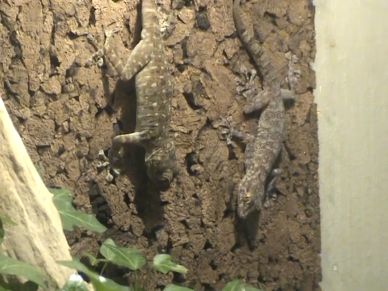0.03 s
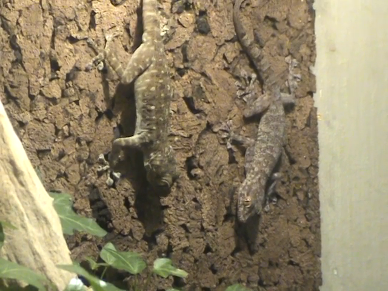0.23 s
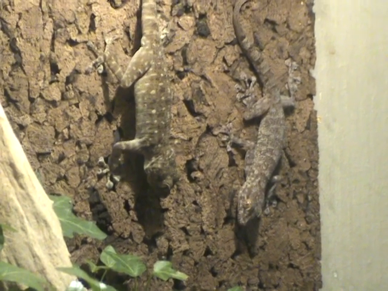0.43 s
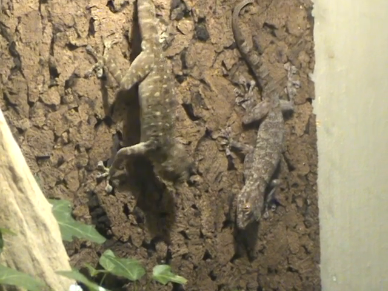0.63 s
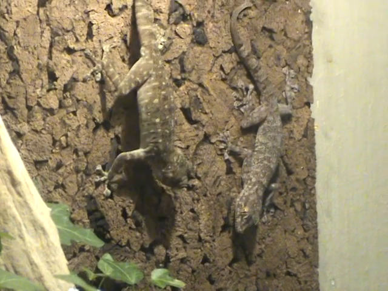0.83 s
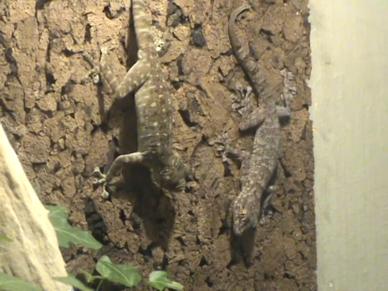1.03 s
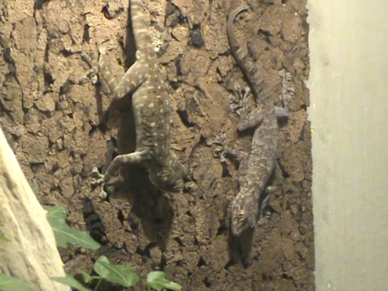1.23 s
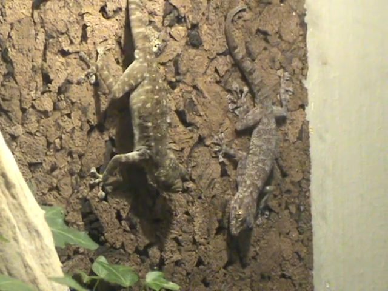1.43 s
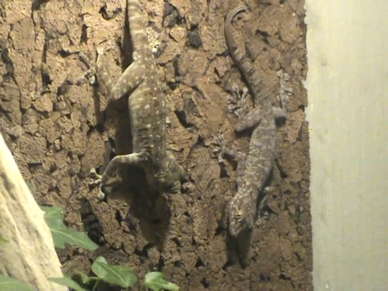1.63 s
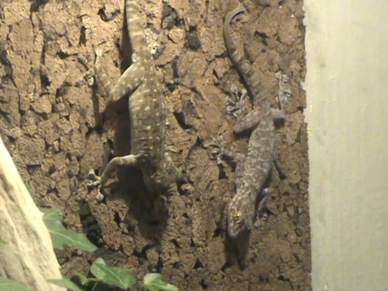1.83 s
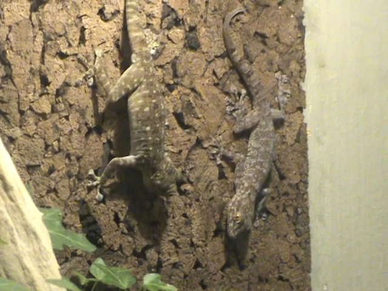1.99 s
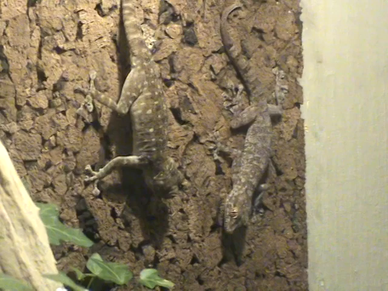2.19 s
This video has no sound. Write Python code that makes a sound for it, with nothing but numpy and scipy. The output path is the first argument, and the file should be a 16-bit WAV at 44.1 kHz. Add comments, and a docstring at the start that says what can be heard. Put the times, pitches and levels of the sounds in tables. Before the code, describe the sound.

In a quiet room, a gecko makes one short, clicking chirp, scuffs faintly on bark, then chirps again. The calls echo briefly off the glass enclosure walls, and a few tiny scuffs follow over a faint, steady hum and hiss.

```python
"""A gecko chirps twice in a glass-walled enclosure in a quiet room.
Each click-like chirp is a few fast throat pulses ringing near 4 kHz, with a falling squeak;
the walls throw it back, the glass rings and the room reverberates.
Behind it: air noise, appliance hum, a faint sinking tone and a few soft scuffs on bark."""
import sys
import numpy as np
from scipy import signal
from scipy.fft import rfft, irfft
from scipy.io import wavfile
from scipy.ndimage import uniform_filter1d

SR = 44100
rng = np.random.default_rng(int(sys.argv[2]) if len(sys.argv) > 2 else 0)


def put_to_file(sound):
    """Save the sound as 16-bit audio at rate SR, in the file named by the first command-line argument."""
    columns = np.atleast_2d(sound).T  # one column per channel
    safe = np.clip(columns, -1, 1)
    whole_steps = np.round(safe * 32767)
    wavfile.write(sys.argv[1], SR, whole_steps.astype(np.int16))


N = 103635


def amp(db):
    return 10 ** (np.asarray(db) / 20)


def unit_rms(x):
    return x / np.sqrt(np.mean(abs(x) ** 2) + 1e-20)


def log_interp(points, hz):
    """Interpolate (Hz, value) rows on a log-frequency axis."""
    point_hz, value = np.transpose(points)
    return np.interp(np.log(hz + 1), np.log(point_hz + 1), value)


def add(mix, start_s, sound):
    part = mix[round(start_s * SR):][:len(sound)]
    part += sound[:len(part)]


def minimum_phase(gain):
    """Spectrum of the quickest causal response with these magnitudes."""
    log_gain = np.log(np.r_[gain, gain[-2:0:-1]])
    return np.exp(np.conj(signal.hilbert(log_gain)))[:len(gain)]


def drift(bandwidth_hz):
    """Low-passed noise, rms 1."""
    hz = np.fft.rfftfreq(N, 1 / SR)
    return unit_rms(irfft(rfft(rng.standard_normal(N)) * np.exp(-(hz / bandwidth_hz) ** 2), N))


def spread(mid, side, side_db):
    """Mid/side to left/right, scaled to unit mid energy."""
    return np.array([mid + amp(side_db) * side, mid - amp(side_db) * side]) / np.linalg.norm(mid)


def tone(hz, level_db, flutter_db=1.2):
    """Sine with a slightly fluttering level."""
    peak = np.sqrt(2) * amp(level_db + flutter_db * drift(25))
    return peak * np.sin(2 * np.pi * (np.cumsum(hz) / SR + rng.random()))


def air(level_db=-55, patch_db=0.7, size=2048):
    """Steady room noise and hiss with faint drifting patches; the bass is nearly mono."""
    # Each row: frequency in Hz, relative spectral density in dB.
    density = [(25, -24), (38, -23), (52, -15), (75, -15), (105, -6), (140, -1), (200, -8.5), (260, -6.5),
               (310, -9), (400, -7.5), (520, -15), (800, -13), (1400, -18.5), (2500, -23), (3600, -25),
               (4500, -28.3), (9000, -31), (15500, -31.7)]
    # Each row: frequency in Hz, left-right coherence from 0 to 1.
    coherence = [(60, 0.99), (150, 0.99), (350, 0.87), (700, 0.083), (1400, 0.23), (3000, 0.13),
                 (6000, 0.34), (10000, 0.56), (15000, 0.93)]
    hop, hz = size // 4, np.fft.rfftfreq(size, 1 / SR)
    left_re, left_im, other_re, other_im, patches = rng.standard_normal((N // hop + 5, len(hz), 5)).T
    patches = uniform_filter1d(patches, size=16, axis=0)  # across frequency
    patches = unit_rms(uniform_filter1d(patches, size=8, axis=1))  # across time
    shared = log_interp(coherence, hz)[:, None]
    left = left_re + 1j * left_im
    right = shared * left + np.sqrt(1 - shared ** 2) * (other_re + 1j * other_im)
    spectra = np.array([left, right]) * amp(log_interp(density, hz)[:, None] + patch_db * patches)
    noise = signal.istft(spectra, nperseg=size, noverlap=size - hop)[1][:, :N]
    return amp(level_db) * unit_rms(noise)


def appliance_hum():
    """Wavering hum of fans and lamps."""
    # Each row: frequency in Hz, level in dB, rms waver in Hz.
    lines = [(119.8, -67, 1.1), (148.2, -64, 1.1), (242.7, -67.5, 0.41), (444.3, -72, 1.87),
             (1049, -71.5, 8.7), (1295, -78.5, 1.5), (2480, -84, 0.52), (5030, -90, 1.3), (9367, -84, 30)]
    return sum(tone(hz + waver_hz * drift(39.7), db) for hz, db, waver_hz in lines)


def sinking_tone():
    """A faint tone that sinks and fades."""
    # Each row: time in seconds, frequency in Hz, level in dB.
    path = [(0, 335, -62.5), (0.4, 343.6, -64.5), (0.548, 344, -70), (0.801, 326.9, -63.5),
            (1.099, 305, -75), (1.5, 298, -102), (2.35, 290, -96)]
    time_s, hz, db = np.transpose(path)
    t = np.arange(N) / SR
    return tone(np.interp(t, time_s, hz), np.interp(t, time_s, db))


def scuff(length_s, level_db, treble_db, size=4096):
    """A brief grainy rub on dry bark."""
    # Each row: frequency in Hz, relative gain in dB.
    bark = [(200, -16), (550, -11), (820, 5), (1200, -8), (2500, -8), (3500, -9), (4100, -15), (4900, -8),
            (6000, -20), (14000, -28)]
    progress, hz = np.arange(size) / SR / length_s, np.fft.rfftfreq(size, 1 / SR)
    envelope = progress * np.exp(-3 * progress)
    grains = rng.standard_normal(size) * rng.exponential(1, size) * envelope
    shelf_db = treble_db * log_interp([(1200, 0.048), (3000, 1)], hz)
    rub = irfft(rfft(grains) * minimum_phase(amp(log_interp(bark, hz) + shelf_db)))
    return amp(level_db) * unit_rms(rub) * np.sqrt(length_s * SR / size)


def squeak(t, start_hz=3268, fall_hz_per_s=134500, delay_s=0.00266, length_s=0.015):
    """A note that slides down as the throat closes."""
    age_s = np.clip(t - delay_s, 0, length_s)
    hz = start_hz - fall_hz_per_s * age_s
    return np.sin(np.pi * age_s / length_s) * np.sin(2 * np.pi * np.cumsum(hz) / SR)


def chirp(length_s, level_db, pulse_hz, throat_hz, squeak_db, size=4096):
    """A short arch of pulses and breath noise rings the throat and mouth; a squeak trails it."""
    # Each row: frequency in Hz, relative gain in dB.
    mouth = [(300, -35), (1200, -22), (2000, -27), (2650, -13), (3400, -2), (4600, 1.5), (5400, -5),
             (6600, -16), (7200, -21), (8000, -26.5), (9000, -32), (12000, -36), (16000, -51)]
    throat_width_hz, throat_db, breath_db = 480, 9.5, -13
    arch_skew, rate_glide = 1.22, 0.0904
    t, hz = np.arange(size) / SR, np.fft.rfftfreq(size, 1 / SR)

    def effort(time_s):
        return np.sin(np.pi * np.clip(time_s / length_s, 0, 1) ** arch_skew)

    pulse_s = (np.arange(8) + 0.5) / pulse_hz
    pulse_s *= 1 - rate_glide * pulse_s / length_s  # pulses speed up
    pulses = unit_rms(effort(pulse_s) @ np.exp(-2j * np.pi * np.outer(pulse_s, hz)))
    breath = amp(breath_db) * unit_rms(rfft(effort(t) * rng.standard_normal(size)))
    throat = 1 + amp(throat_db) / (1 + (2 * (hz - throat_hz) / throat_width_hz) ** 2)
    click = irfft((pulses + breath) * minimum_phase(throat * amp(log_interp(mouth, hz))))
    call = unit_rms(click) + amp(squeak_db) * unit_rms(squeak(t))
    return amp(level_db) * call * np.sqrt(length_s * SR / size)


def enclosure(source):
    """Wall echoes, quick scatter and ringing in the glass box, then the room's longer tail."""
    # Each row: delay in seconds, linear gain.
    wall_echoes = [(0.001, 0.5), (0.0015, 0.57), (0.003352, 0.41), (0.005076, 0.7), (0.008378, 0.7),
                   (0.0133, 0.45)]
    # Each row: frequency in Hz, initial level in dB, T60 in seconds.
    box_modes = [(2917, -41.5, 0.21), (3420, -51, 0.41), (3610, -64, 0.22), (3880, -58, 0.31),
                 (3900, -73, 0.17), (3990, -100, 0.59), (4210, -60, 0.54), (4850, -58, 0.26),
                 (4736, -52.5, 0.42), (4800, -68, 0.3), (5500, -49, 0.32), (5640, -54, 0.29)]
    # Each row: frequency in Hz, T60 in seconds.
    room_t60 = [(500, 1), (2500, 0.53), (4200, 0.37), (6500, 0.58), (12000, 0.32)]
    scatter_db, scatter_t60_s = -14, 0.048
    room_db, room_build_s = -3, 0.019
    t, hz = np.arange(SR) / SR, np.fft.rfftfreq(SR, 1 / SR)
    echoes = sum(gain * np.exp(-2j * np.pi * hz * delay_s) for delay_s, gain in wall_echoes)
    early = irfft(1 + echoes, SR)  # 1 = direct path
    scatter = rng.standard_normal((2, SR)) * amp(-60 * t / scatter_t60_s) * (t > wall_echoes[0][0])
    band_hz, frame_s, spectra = signal.stft(rng.standard_normal((2, SR)), SR, nperseg=256)
    spectra *= amp(-60 * frame_s / log_interp(room_t60, band_hz)[:, None])
    room = signal.istft(spectra, SR, nperseg=256)[1][:, :SR] * np.minimum(t / room_build_s, 1)
    rings = sum(amp(db - 60 * t / t60_s) * np.sin(2 * np.pi * (mode_hz * t + rng.random()))
                for mode_hz, db, t60_s in box_modes)
    response = (early + rings + amp(scatter_db) * spread(*scatter, side_db=0)
                + amp(room_db) * spread(*room, side_db=-8.5))
    return signal.fftconvolve(source[None], response, axes=1)[:, :N]


def scene():
    """The gecko in its enclosure, over the room's background."""
    # Each row: start in seconds, length in seconds, dry level in dB, initial pulse rate in Hz,
    # throat resonance in Hz, squeak in dB relative to the click.
    chirps = [(0.2460, 0.0118, -31, 439.3, 4020, -21), (1.474, 0.0108, -32, 536.6, 4070, -18)]
    # Each row: start in seconds, decay length in seconds, dry level in dB, treble shelf in dB.
    scuffs = [(0.575, 0.027, -69, -4), (0.85, 0.052, -68.5, -9), (1.05, 0.051, -76, -7),
              (2.105, 0.0073, -64.5, 17), (2.143, 0.015, -62, -13), (2.184, 0.0066, -59.5, -5)]
    gecko = np.zeros(N)
    for start_s, *settings in chirps:
        add(gecko, start_s, chirp(*settings))
    for start_s, *settings in scuffs:
        add(gecko, start_s, scuff(*settings))
    return enclosure(gecko) + air() + appliance_hum() + sinking_tone()


def record(dry):
    """Steep low-pass at 16 kHz."""
    low_pass = signal.firwin(511, 16000, window=("kaiser", 9), fs=SR)
    return signal.oaconvolve(dry, low_pass[None], "same")


dry = scene()
out = record(dry)
put_to_file(out)
```